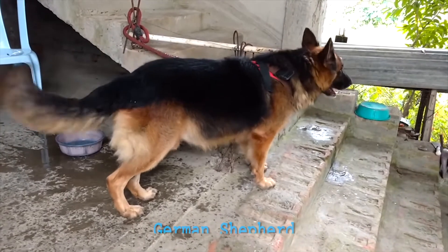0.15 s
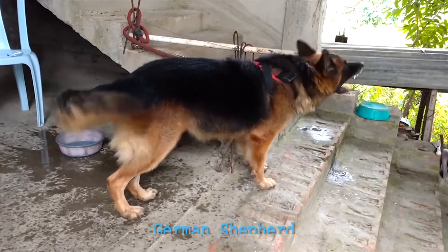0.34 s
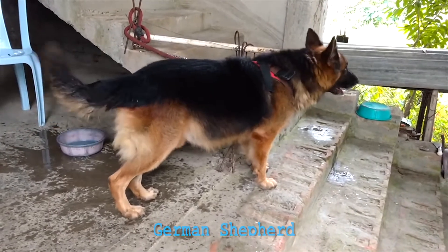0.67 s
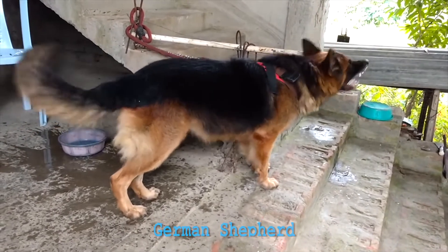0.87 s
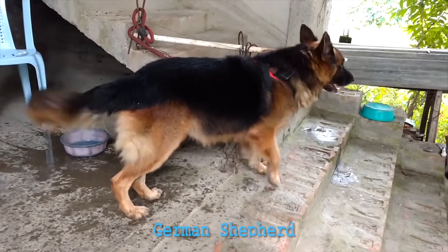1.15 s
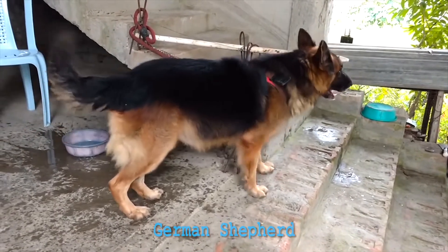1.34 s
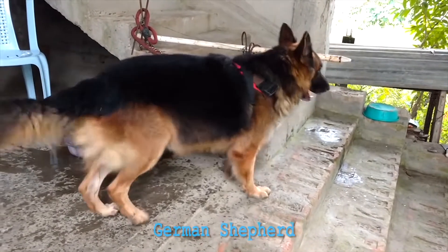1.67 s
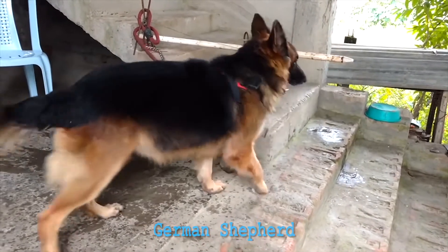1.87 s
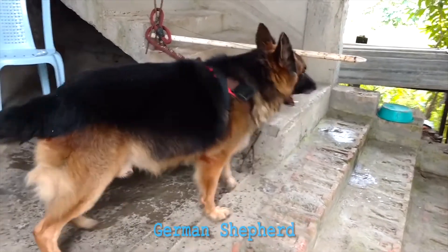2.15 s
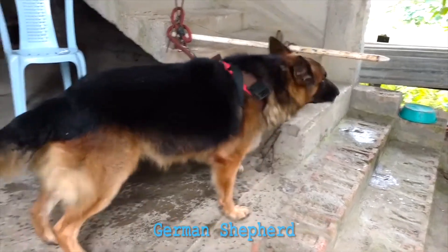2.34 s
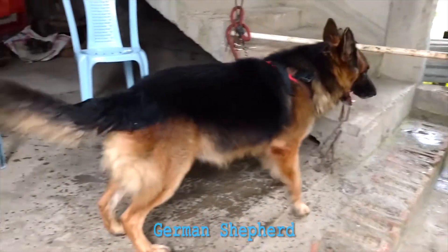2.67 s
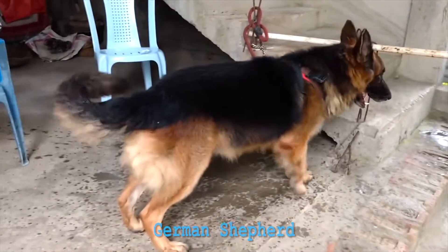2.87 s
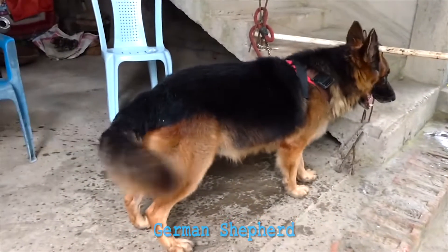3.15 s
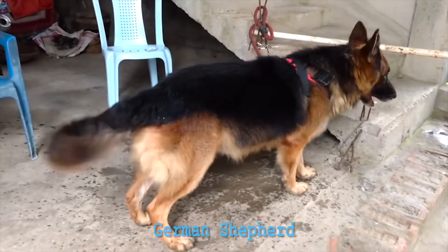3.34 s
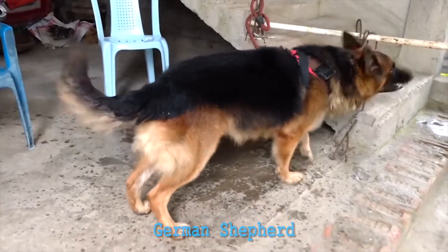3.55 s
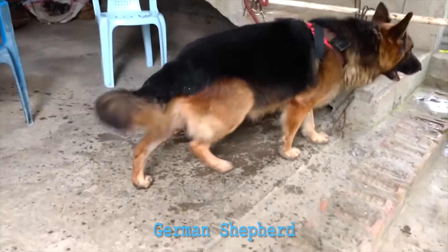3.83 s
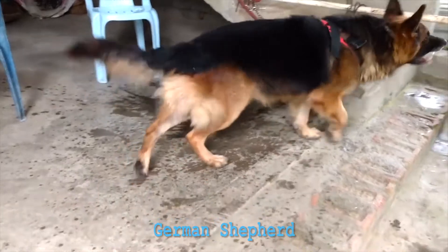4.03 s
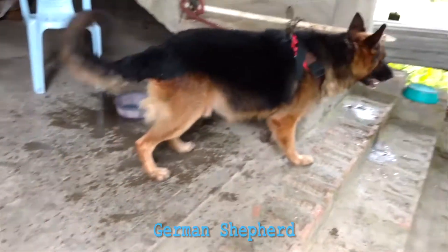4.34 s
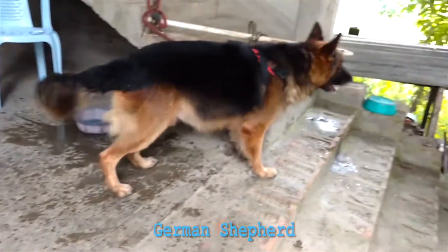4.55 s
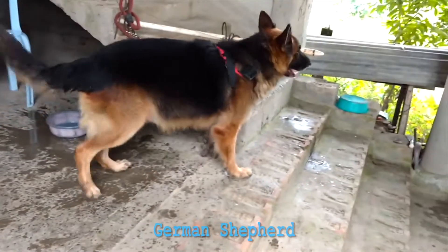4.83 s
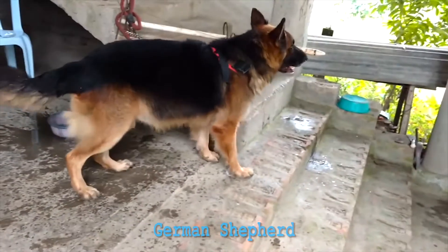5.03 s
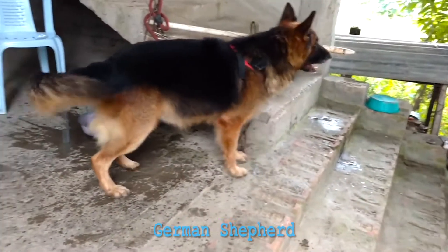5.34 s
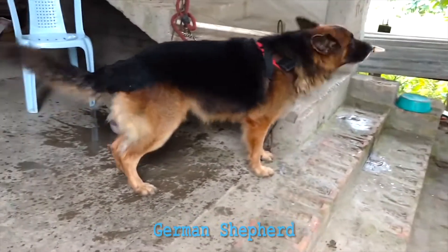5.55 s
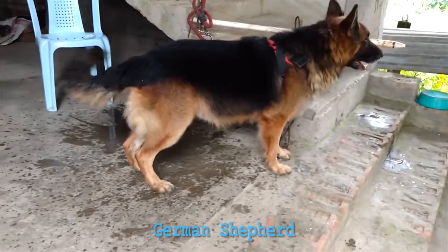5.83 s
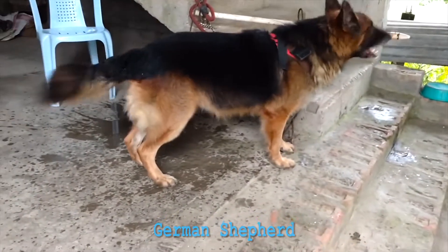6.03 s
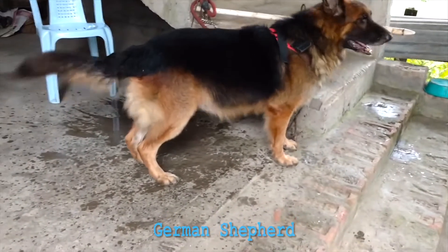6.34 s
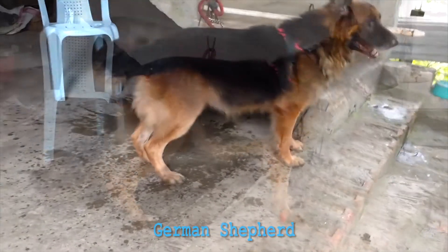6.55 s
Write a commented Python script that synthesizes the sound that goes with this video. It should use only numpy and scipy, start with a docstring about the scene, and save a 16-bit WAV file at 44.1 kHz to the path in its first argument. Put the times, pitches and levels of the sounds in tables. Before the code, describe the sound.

A large dog, already barking, lets out short, hoarse, arching barks in clusters of two or three on a concrete porch. Each has a brief boxy reverberation. Soft grumbles fall in the gaps, and a claw ticks just before the loudest bark around two seconds. Later a thin whine sinks before another quick pair. Faint insects hiss outdoors; a close handheld stereo phone picks it up.

```python
"""Throughout: insects hiss in the trees over faint yard air, as coloured noise of varying level.
From the start, already mid-bark: a big shepherd dog barks in runs on a concrete porch, each bark an arch of
pitch through throat and mouth, with a diffuse tail and standing waves after it; the loud ones thump low.
From 1.5 s soft low grumbles and a huff fall between; a claw taps at 2.2 s, just before the loudest bark; a
thin nasal whine sinks at 5.1 s. A phone with two microphone ports listens from close by."""
import sys
import numpy as np
from scipy import signal
from scipy.fft import rfft, irfft, next_fast_len
from scipy.io import wavfile
from scipy.ndimage import uniform_filter1d, minimum_filter1d, map_coordinates

SR = 44100
rng = np.random.default_rng(int(sys.argv[2]) if len(sys.argv) > 2 else 0)


def file_out(sig):
    """Save sig as 16-bit WAV at sys.argv[1]."""
    # one column per channel
    cols = np.atleast_2d(sig).T
    # limit, then scale
    lim = np.clip(cols, -1, 1)
    pcm = np.round(lim * 32767).astype(np.int16)
    wavfile.write(sys.argv[1], SR, pcm)


N = 295029

# All levels are relative, ahead of the gains in the functions.
# insect level: start_s, level_db
INSECTS = [(0.0, -64), (3.99, -63.5), (4.15, -57), (5.07, -60), (5.48, -56.5), (5.63, -62), (6.69, -64)]
# insect spectrum: freq_hz, density_db_per_hz
CHORUS = [(5500, -82), (7200, -5.5), (8100, -4.5), (8900, -0.5), (9700, -3.5), (11000, -18), (12500, -39)]
# yard air spectrum: freq_hz, density_db_per_hz
YARD = [(30, -37.5), (100, -8), (300, -4), (600, 6.5), (1200, 1), (2500, -8.5), (6000, -16), (11000, -23.5),
        (15000, -38)]
# decay of the diffuse tail: freq_hz, t60_s
PORCH = [(130, 0.55), (260, 0.67), (420, 0.51), (1100, 0.45), (2800, 0.44), (8000, 0.51), (14000, 0.54)]
# standing waves between floor, ceiling and walls: freq_hz, level_db, t60_s
STANDING = [(427.5, -27, 0.33), (586.3, -20, 0.36), (866, -42.5, .45), (1081, -23.5, 0.5),
            (1434, -22.5, 0.15), (1492, -25, 0.5), (1562, -26.5, 0.59), (1634, -36.5, 0.98)]
# claw taps on concrete: start_s, level_db
CLAWS = [(2.208, -43.5)]
# claw spectrum: freq_hz, density_db_per_hz
CLAW_TICK = [(500, -20.5), (2000, -14.5), (5500, 6.5), (9000, -12), (15000, -6)]
# whine through the nose: time_s, pitch_hz, level_db
WHINE = [(5.1, 3050, -65), (5.15, 2988, -55.5), (5.22, 2960, -55), (5.27, 2653, -56.5), (5.33, 2440, -65.5),
         (5.38, 2411, -98.5)]
# overall vocal tract response: freq_hz, gain_db
TRACT = [(40, -32), (150, -6.5), (250, -14.5), (325, -1), (400, 1.5), (600, 11), (1500, -3), (2300, -4.5),
         (2550, -14), (2800, -42.5), (4000, -45)]
# hiss past the teeth: freq_hz, gain_db
RASP = [(1800, -28), (2550, 10), (2950, 5.5), (3600, 0.5), (4400, 2.5), (5000, 7.5), (5700, 0), (7500, 3),
        (9000, -6.5), (11000, -9.5), (12500, -19), (15000, -20.5)]
# grumbles and huff: start_s, length_s, peak_pitch_hz, level_db, mouth_opening_db, roughness_0_to_1, chest_db
GRUMBLES = [(1.46, 0.17, 172, -31.5, -1, .25, -15), (2.167, 0.12, 142.8, -32, -10.5, 0, -20),
            (3.209, 0.074, 113.8, -46, 2.5, 0, -10.5), (4.871, .13, 111, -48.5, 6, 0, -10),
            (5.087, 0.1, 300, -50.5, 3, 0.65, -15), (6.424, .15, 109.9, -56.5, 1.5, 0.43, -8)]
# nearly closed mouth: throat_hz, mouth_hz, muzzle_hz, muzzle_db, teeth_db
GRUMBLE_MOUTH = (541.5, 1059, 1466.5, 4, 13.5)
# barks: start_s, rise_s, widest_gape_s, length_s, held_pitch_hz, top_pitch_hz, level_db, mouth_opening_db,
# roughness_0_to_1, throat_hz, mouth_hz, muzzle_hz, muzzle_db, teeth_db, rasp_db, chest_db, thump_db
BARKS = [(-0.11, 0.048, 0.072, 0.095, 408, 426, -16.5, -0.5, 0.36, 410, 980, 1410, -32, 5.5, -21.5, -16, -61),
         (0.159, 0.056, 0.099, .168, 302.9, 404.2, -9.5, -2, 0.22, 703, 970, 1790, 6, 15, -22, -19.5, -60.5),
         (0.37, 0.044, 0.079, .114, 299.8, 385.2, -10, 1, 0.15, 577, 970, 1640, 3, 11.5, -24.5, -21, -63),
         (0.753, 0.058, 0.11, 0.14, 283.1, 387.5, -14.5, 3.5, 0.5, 550, 924, 1580, 4, 12, -19.5, -21.5, -70),
         (0.913, 0.038, 0.084, 0.11, 312.7, 346.6, -14, 0.5, 0.49, 547, 990, 1750, 5.5, 14, -20, -29, -63),
         (1.131, 0.051, 0.089, 0.14, 290.8, 487.7, -14, 1, 0.29, 616, 910, 1260, 5, 11.5, -18.5, -11, -71.5),
         (1.77, 0.07, 0.11, 0.12, 289.4, 507.4, -11.5, 5, 0.29, 557, 1197, 1590, -1.5, 4.5, -22.5, -17.5, -65.5),
         (2.26, 0.068, 0.071, 0.086, 303.5, 333.3, -2.5, -5.5, 0.24, 663, 1176, 1440, 0.5, 7, -23, -26, -43),
         (2.468, 0.036, 0.082, 0.12, 291.8, 473, -16, 5, 0.47, 610, 1034, 1500, -1, 4.5, -24.5, -28.5, -71),
         (2.827, 0.065, .095, 0.16, 301.5, 411.7, -15, 2, 0.4, 612, 920, 1400, 1, 8, -24, -18.5, -65),
         (3.461, 0.064, 0.13, 0.18, 311.4, 525.3, -14, 5, 0.42, 548, 1100, 1300, -53, -1.5, -23.5, -21, -66),
         (3.904, 0.066, 0.11, .16, 296.7, 399.7, -16, 3.5, 0.52, 584, 1040, 1610, 0, 7.5, -22, -19.5, -62),
         (4.083, 0.066, 0.0745, 0.12, 430.8, 442.5, -11, 0, .24, 452, 964, 1440, -2, 9, -21.5, -18, -71.5),
         (4.625, .062, 0.087, 0.15, 281, 367.4, -13, 2.5, 0.33, 564, 1000, 1636, 2, 11.5, -24, -16.5, -73),
         (5.367, .04, 0.11, .16, 263.8, 305.7, -11.5, 0.5, 0.3, 518, 994, 1430, -1.5, 8.5, -21.5, -26, -61),
         (5.499, 0.048, 0.062, 0.097, 344.4, 379.2, -11.5, 1, 0.39, 515, 1030, 1540, 0.5, 8, -22.5, -20, -75),
         (5.803, 0.058, 0.092, 0.14, 296.5, 481.5, -11.5, 1, 0.45, 650, 1005, 1470, 1.5, 7, -21.5, -23, -57.5),
         (6.077, 0.07, 0.083, 0.12, 292.7, 380.5, -13, 3.5, 0.27, 617, 1196, 1326, -10.5, -2, -26.5, -23.5, -64)]
# low thump under the loud barks: freq_hz, density_db_per_hz
THUMP = [(25, -5.5), (60, -4), (110, -4.5), (200, -17), (500, -49)]
# ports out of step: freq_hz, half_phase_lag_rad
PORT_LAG = [(0, -.15), (650, -.45), (1200, 0), (1500, .42), (1800, .85), (2500, np.pi / 2),
            (15000, 11 * np.pi / 2)]
# port balance: freq_hz, left_minus_right_db
BALANCE_DB = [(100, -7), (380, -10.5), (550, -7), (800, -6.5), (1220, -1.5), (1480, -1), (1900, -0.5),
              (8000, -2)]

CHORUS_DB = 4.5  # added to every insect level
TAIL_S, CALL_S = 0.6, 0.26  # porch tail, buffer of one call
CLAW_T60_S = 0.025
GRUMBLE_SWELL_DB, GRUMBLE_BEND = 20, 0.72  # level and pitch arch together; bend is a share of pitch
# lung push: climbs from ONSET_DB below full, sags while held, then lets go
ONSET_DB, SAG_DB_PER_S, RELEASE_DB_PER_S = 30, 15.5, 905
ATTACK_S = 0.0013  # onset time constant of the voice
LUNG_LAG_S = 0.017  # smoothing window of the push
SLACK_HZ, TENSE_S = 139.46, 0.03  # pitch of slack folds, time constant of tightening
GAPE_SHARE = 0.22  # width of the gape, as a share of bark length
GAPE_DRAIN_DB, SHUT_DB = 5, 6.5  # wide jaw drains the throat; narrow jaw muffles the mouth
RASP_SWELL_DB, THUMP_SWELL_DB = 3.5, 1  # fall of hiss and thump as the jaw shuts
TOP_HZ = 15370  # upper band limit


def amp(db):
    """Decibels to gain."""
    return 10 ** (np.asarray(db) / 20)


def unit(x):
    """x at rms 1."""
    return x / np.sqrt(np.mean(np.abs(x) ** 2) + 1e-20)


def along(points, hz):
    """(freq_hz, value) points read on a log axis."""
    f, v = np.transpose(points)
    return np.interp(np.log(hz + 1), np.log(f + 1), v)


def curves(rows):
    """One value per sample for each column after the time."""
    time_s, *cols = np.transpose(rows)
    return [np.interp(np.arange(N) / SR, time_s, c) for c in cols]


def wobble(rate_hz, size=N):
    """Smooth random curve, rate_hz knots a second."""
    knots = rng.standard_normal(int(size * rate_hz / SR) + 4)
    return map_coordinates(knots, [np.arange(size) * rate_hz / SR])


def filtered(x, response):
    """x times a complex response of frequency."""
    n = x.shape[-1]
    m = next_fast_len(n + 4096)
    return irfft(rfft(x, m) * response(np.fft.rfftfreq(m, 1 / SR)), m)[..., :n]


def noise(spectrum, channels=1, size=N):
    """Coloured noise of rms 1."""
    white = rng.standard_normal((channels, size))
    return unit(filtered(white, lambda hz: amp(along(spectrum, hz))))


def resonance(hz, centre_hz, width_hz):
    """One causal resonance with peak gain 1."""
    return 1j * hz * width_hz / (centre_hz ** 2 - hz ** 2 + 1j * hz * width_hz)


def add(out, x, start_s):
    """Mixes x into out at start_s; cuts what falls outside."""
    i = round(start_s * SR)
    x = x[..., max(-i, 0):N - i]
    out[..., max(i, 0):max(i, 0) + x.shape[-1]] += x


def outdoors():
    """Fluttering band of insect hiss over the faint air of the yard."""
    level_db, = curves(INSECTS)
    insects = amp(level_db + CHORUS_DB + 2.2 * wobble(22)) * noise(CHORUS, channels=2)
    return insects + amp(-57) * noise(YARD, channels=2)


def porch(x, build_up_s):
    """Concrete's answer at each port: diffuse tail with frequency-dependent decay, plus standing waves."""
    hz, t, z = signal.stft(rng.standard_normal((2, int(TAIL_S * SR))), SR, nperseg=256)
    decay = amp(-60 * t / along(PORCH, hz)[:, None])
    tail = signal.istft(z * decay, SR, nperseg=256)[1]
    t = np.arange(tail.shape[1]) / SR
    tail *= 1 - np.exp(-t / build_up_s)
    tail /= np.linalg.norm(tail[0])
    for mode_hz, level_db, t60_s in STANDING:
        phase = 2 * np.pi * (mode_hz * t + rng.random((2, 1)))
        ring = np.sin(phase) * amp(-60 * t / t60_s)
        tail += amp(level_db) * ring / np.linalg.norm(ring[0])
    return signal.fftconvolve(x[None], tail, axes=1)


def on_porch(call, direct_db=-3.5, echo_db=-1.5):
    """Each call gets its own randomly drawn tail, scaled to the same share of its energy."""
    wet = porch(call, build_up_s=0.0013)
    wet *= amp(echo_db) * np.linalg.norm(call) / np.linalg.norm(wet, axis=1, keepdims=True)
    direct = np.pad(call, (0, wet.shape[1] - len(call)))
    return wet + amp(direct_db) * direct


def claw(level_db):
    """Short dry tick: coloured noise under a fast exponential decay."""
    t = np.arange(int(CALL_S * SR)) / SR
    return amp(level_db - 60 * t / CLAW_T60_S) * noise(CLAW_TICK, size=len(t))[0]


def whine():
    """Thin, unsteady whistle with one overtone; it sinks just before a bark."""
    pitch_hz, level_db = curves(WHINE)
    t = np.arange(N) / SR
    phase = 2 * np.pi * np.cumsum(pitch_hz * (1 + 0.022 * wobble(150))) / SR
    whistle = np.sin(phase) + 0.24 * np.sin(2 * phase)
    return amp(level_db) * whistle * (t > WHINE[0][0]) * (t < WHINE[-1][0])


def larynx(pitch_hz, rough, jitter, flutter_db, doubling):
    """Buzz of the vocal folds, the air they chop, and the bare fundamental."""
    n = len(pitch_hz)
    # the rougher the voice, the more the period wanders
    wander = jitter * (rough + 0.093) * wobble(262.2, n) + 0.01615 * wobble(44.7, n)
    phase = 2 * np.pi * np.cumsum(pitch_hz * (1 + wander)) / SR
    buzz = sum(np.cos(k * phase) for k in range(1, 15)) * np.sqrt(4 * pitch_hz / SR)
    # alternate strong and weak cycles put lines halfway between the harmonics
    buzz *= 1 + doubling * rough * np.cos(phase / 2)
    buzz *= amp(flutter_db * rough * wobble(154, n))
    air = unit(rng.standard_normal(n) * (1 + 0.27 * np.cos(phase)))
    return buzz, air, np.sqrt(2) * np.sin(phase)


def voice(pitch_hz, rough, throat_db, mouth_db, rasp_db, chest_db, shape):
    """One call through its own throat and mouth resonances; the chest hums along."""
    throat_hz, mouth_hz, muzzle_hz, muzzle_db, teeth_db = shape
    n = len(pitch_hz)
    rough = np.clip(rough, 0.01, 0.98)
    buzz, air, hum = larynx(pitch_hz, rough, jitter=0.076, flutter_db=9.0, doubling=1.0)

    def blend(air_share):
        return np.sqrt(1 - air_share) * buzz + np.sqrt(air_share) * air

    def throat(hz):
        return unit(amp(along(TRACT, hz)) * resonance(hz, throat_hz, 340) * resonance(hz, 350, 920))

    def mouth(hz):
        peaks = resonance(hz, mouth_hz, 413)
        peaks = peaks - amp(muzzle_db + 4) * resonance(hz, muzzle_hz, 300)
        peaks = peaks + amp(teeth_db - 9.0) * resonance(hz, 1800, 820)
        return unit(amp(along(TRACT, hz)) * resonance(hz, 1315, 2500) * peaks)

    # the upper partials break up into noise first
    low = filtered(amp(throat_db) * blend(rough ** 2), throat)
    high = filtered(amp(mouth_db) * blend(rough), mouth)
    # chopped air hisses past the teeth in uneven spurts
    hiss = unit(filtered(air, lambda hz: amp(along(RASP, hz))))
    rasp = amp(mouth_db + rasp_db + 1.9 * wobble(130, n)) * hiss
    chest = amp(throat_db + chest_db + 0.43 * wobble(60, n)) * hum
    return (low + high + rasp + chest) * (1 - np.exp(-np.arange(n) / SR / ATTACK_S))


def grumbles():
    """Slack folds rattle behind a nearly closed mouth. Yields (start_s, voice)."""
    t = np.arange(int(CALL_S * SR)) / SR
    for start_s, length_s, peak_hz, level_db, open_db, rough, chest_db in GRUMBLES:
        slack = 1 - np.sin(np.pi * np.minimum(t / length_s, 1))
        release_db = RELEASE_DB_PER_S * np.maximum(t - length_s, 0)
        throat_db = level_db - GRUMBLE_SWELL_DB * slack - release_db
        pitch_hz = peak_hz * (1 - GRUMBLE_BEND * slack)
        yield start_s, voice(pitch_hz, rough, throat_db, throat_db + open_db, rasp_db=-21,
                             chest_db=chest_db, shape=GRUMBLE_MOUTH)


def barks():
    """Lungs push, folds tighten, jaw swings: pitch and brightness arch. Yields (start_s, voice, thump)."""
    t = np.arange(int(CALL_S * SR)) / SR
    for (start_s, rise_s, crest_s, length_s, held_hz, top_hz, level_db, open_db, rough,
         *shape, rasp_db, chest_db, thump_db) in BARKS:
        push_db = -ONSET_DB * np.maximum(1 - t / rise_s, 0)
        push_db -= SAG_DB_PER_S * np.maximum(t - rise_s, 0)
        push_db -= RELEASE_DB_PER_S * np.maximum(t - length_s, 0)
        push_db = uniform_filter1d(push_db, size=int(LUNG_LAG_S * SR), mode="nearest")
        gape = np.exp(-0.5 * ((t - crest_s) / (GAPE_SHARE * length_s)) ** 2)
        pitch_hz = held_hz + (SLACK_HZ - held_hz) * np.exp(-t / TENSE_S) + (top_hz - held_hz) * gape
        throat_db = level_db + push_db - GAPE_DRAIN_DB * gape
        mouth_db = level_db + push_db + open_db - SHUT_DB * (1 - gape)
        hiss_db = rasp_db - RASP_SWELL_DB * (1 - gape)
        # low thump, as from an overloaded microphone: swings twice as far in dB as the push
        swing_db = thump_db + 2 * push_db - THUMP_SWELL_DB * (3 - gape)
        thump = amp(swing_db) * noise(THUMP, size=len(t))[0]
        yield start_s, voice(pitch_hz, rough, throat_db, mouth_db, hiss_db, chest_db, shape), thump


def scene():
    """Insects and yard air, then the dog on its porch; thumps are added without echo."""
    out = outdoors() + on_porch(whine())[:, :N]
    for start_s, level_db in CLAWS:
        add(out, on_porch(claw(level_db)), start_s)
    for start_s, call in grumbles():
        add(out, on_porch(call), start_s)
    for start_s, call, thump in barks():
        add(out, on_porch(call), start_s)
        add(out, thump, start_s)
    return out


def limiter(pair):
    """Turns the gain down for a few milliseconds around peaks above full scale."""
    need = 1 / np.maximum(np.abs(pair).max(axis=0), 1)
    return pair * uniform_filter1d(minimum_filter1d(need, size=301), size=201)


def record(dry):
    """Spaced ports trade sound between sum and difference; a limiter holds the loudest peaks."""
    def lag_rad(hz):
        return np.interp(hz, *np.transpose(PORT_LAG))

    mid = filtered(dry[0], lambda hz: np.cos(lag_rad(hz)))
    side = filtered(dry[1], lambda hz: -1j * np.sin(lag_rad(hz)))
    # the low room sound differs between the ports
    side += filtered(dry[0] - dry[1], lambda hz: 0.5 / (1 + (hz / 800) ** 4))
    pair = np.array([mid + side, mid - side])
    pair = filtered(pair, lambda hz: amp(np.outer([0.5, -0.5], along(BALANCE_DB, hz))))
    return filtered(limiter(pair), lambda hz: hz < TOP_HZ)


dry = scene()
out = record(dry)
file_out(out)
```